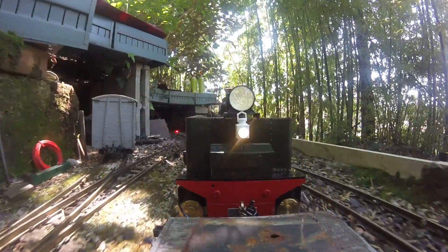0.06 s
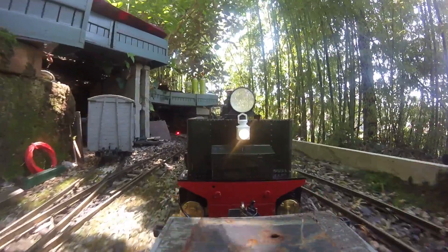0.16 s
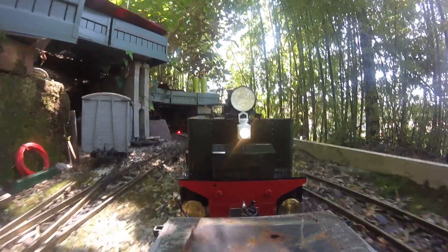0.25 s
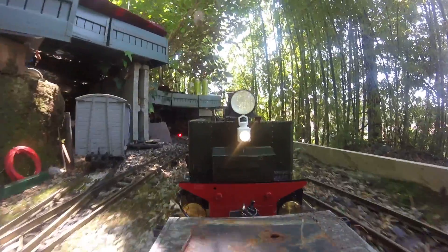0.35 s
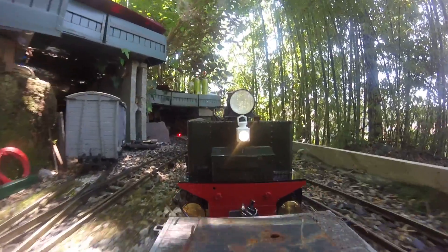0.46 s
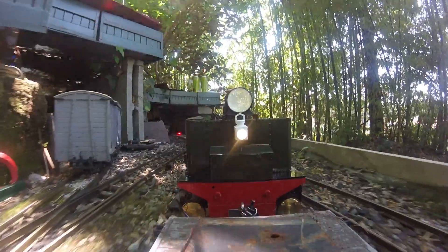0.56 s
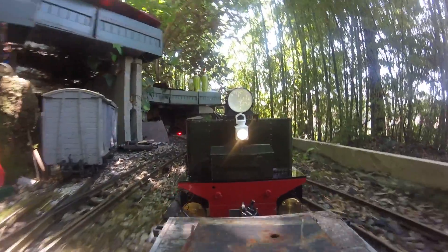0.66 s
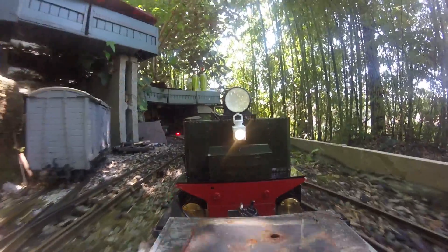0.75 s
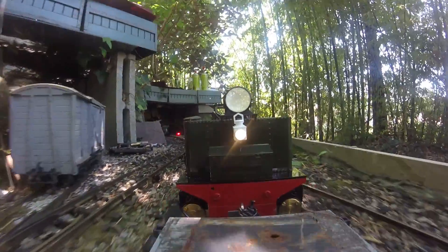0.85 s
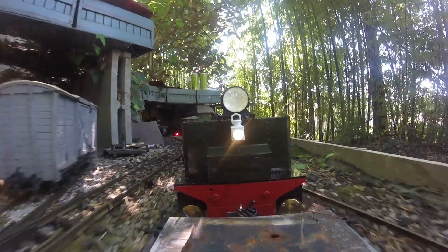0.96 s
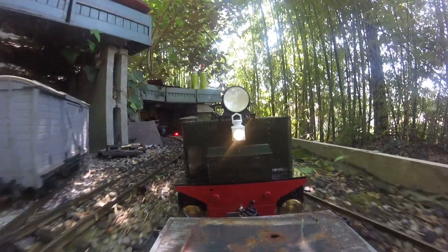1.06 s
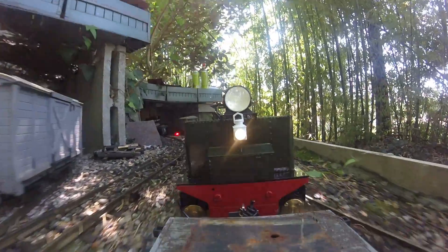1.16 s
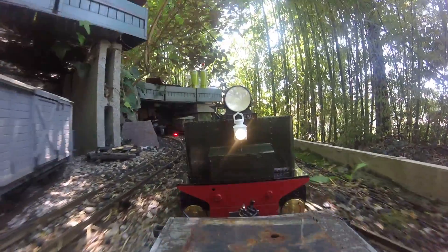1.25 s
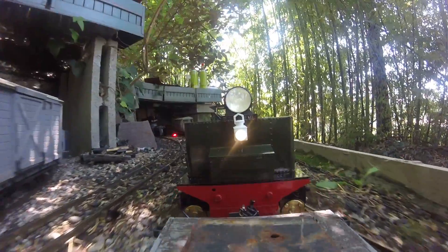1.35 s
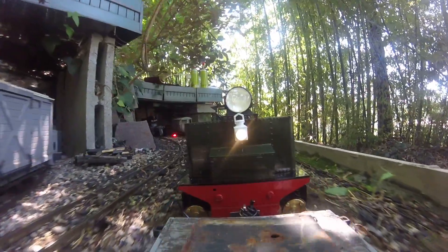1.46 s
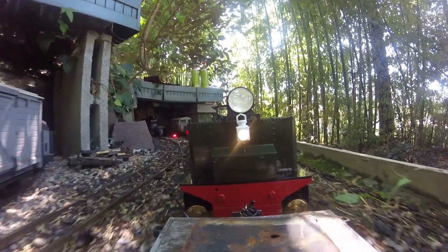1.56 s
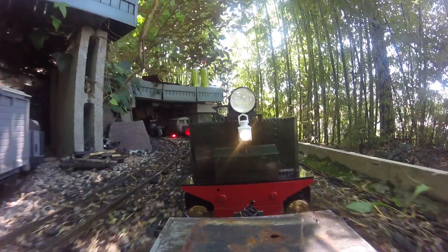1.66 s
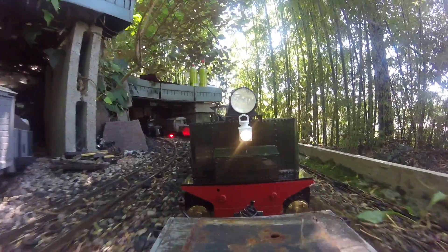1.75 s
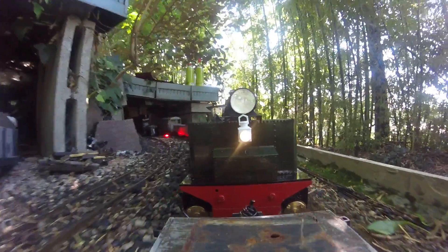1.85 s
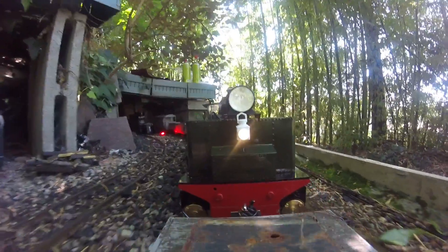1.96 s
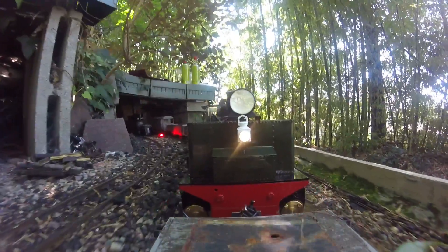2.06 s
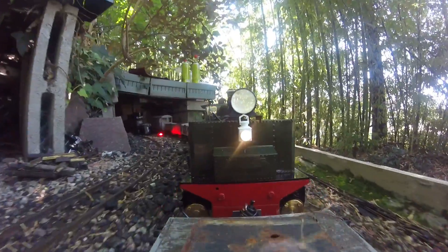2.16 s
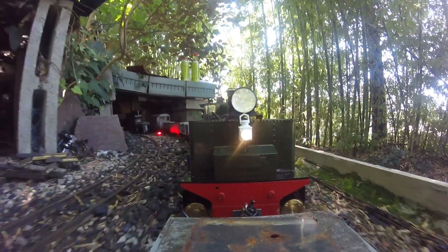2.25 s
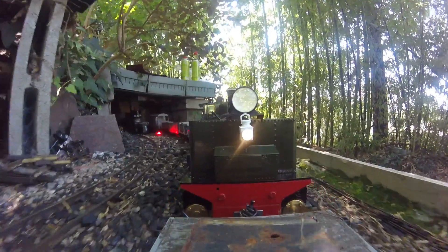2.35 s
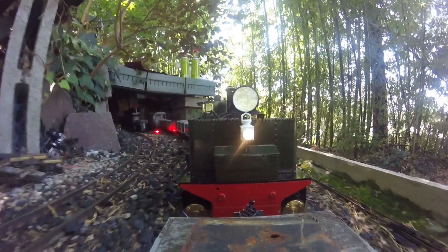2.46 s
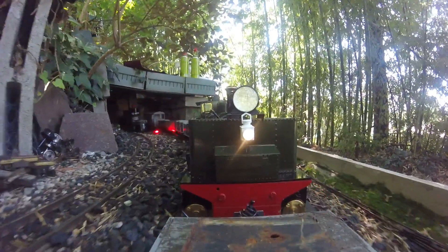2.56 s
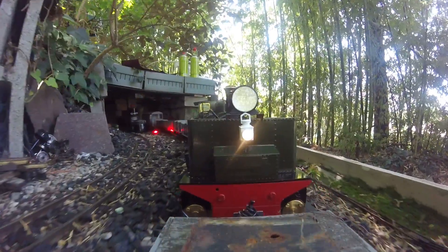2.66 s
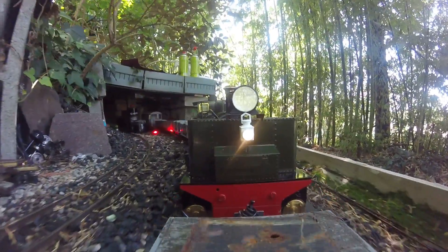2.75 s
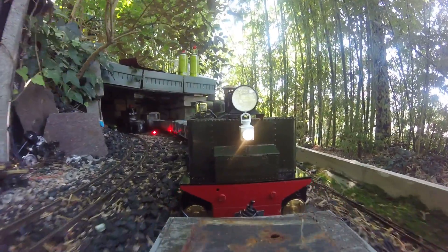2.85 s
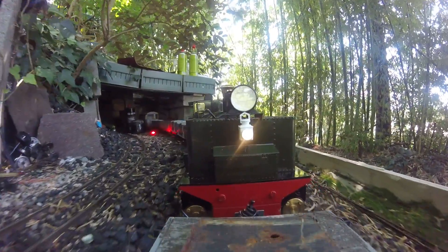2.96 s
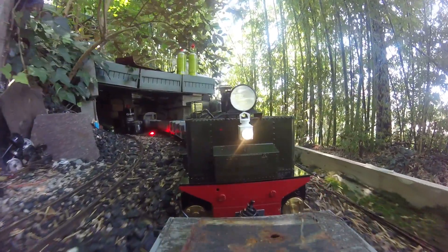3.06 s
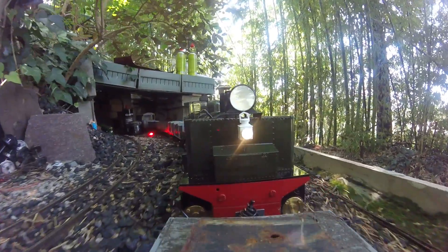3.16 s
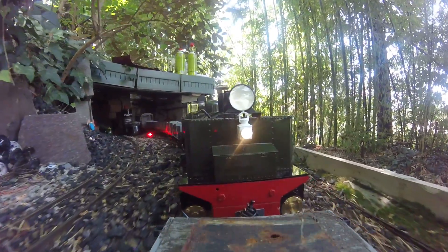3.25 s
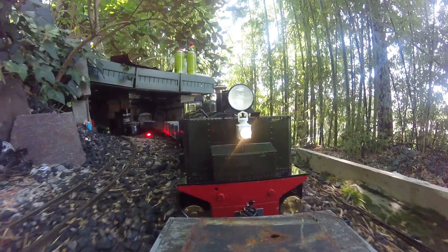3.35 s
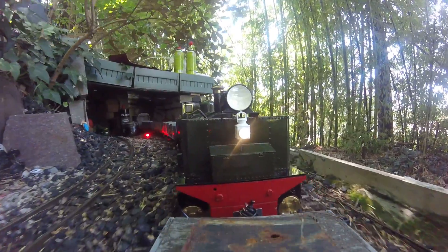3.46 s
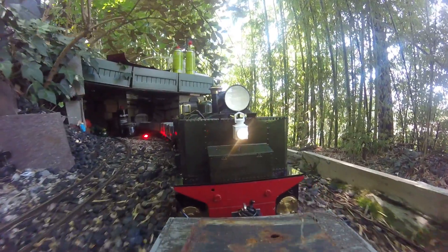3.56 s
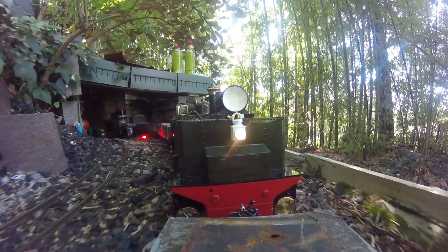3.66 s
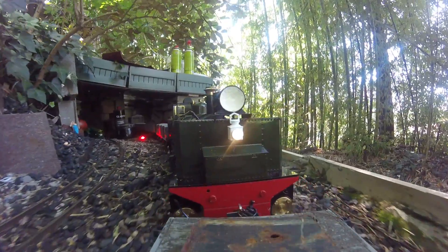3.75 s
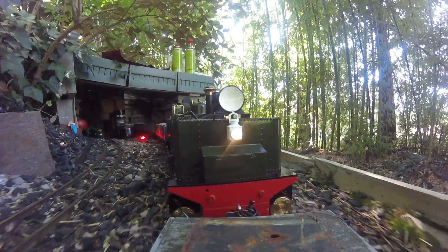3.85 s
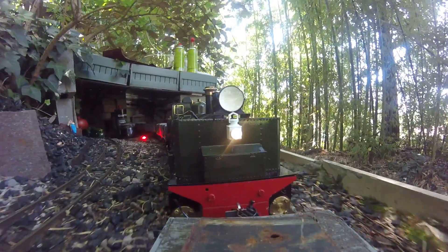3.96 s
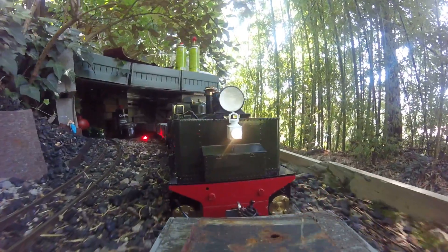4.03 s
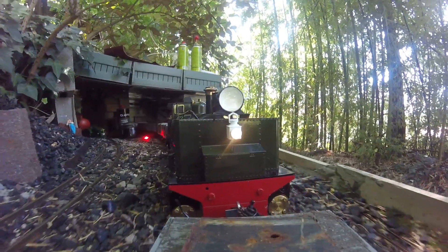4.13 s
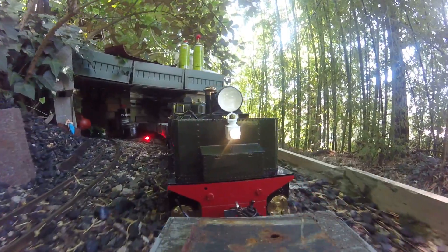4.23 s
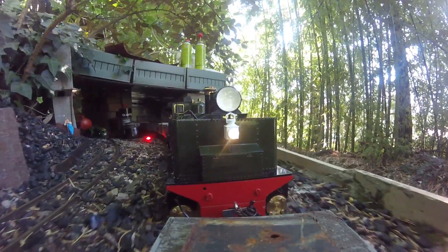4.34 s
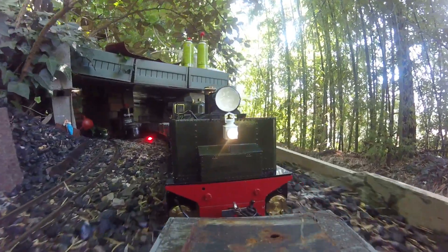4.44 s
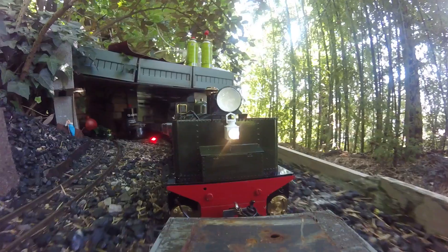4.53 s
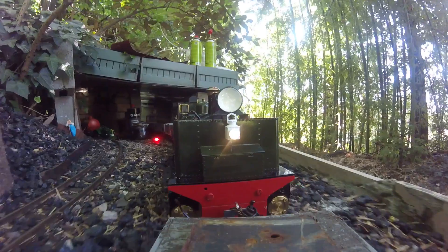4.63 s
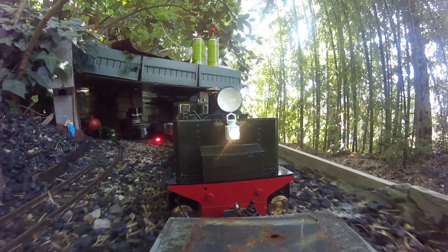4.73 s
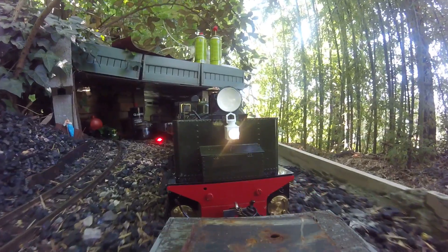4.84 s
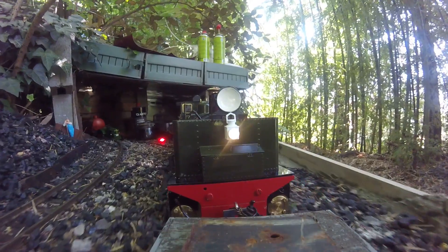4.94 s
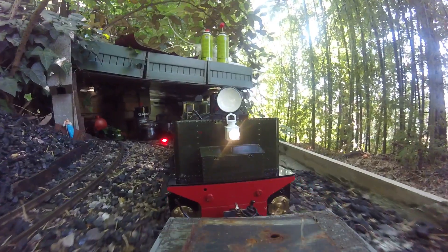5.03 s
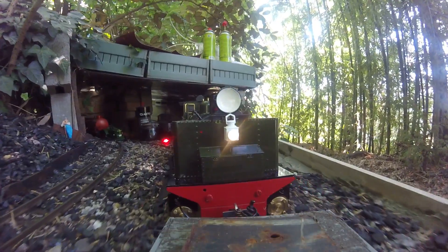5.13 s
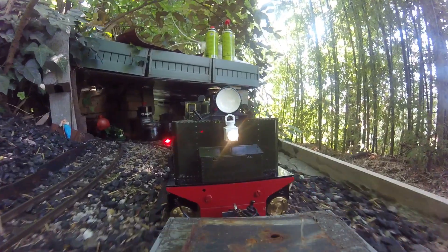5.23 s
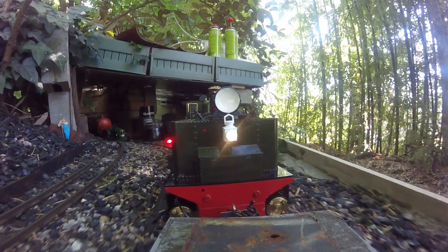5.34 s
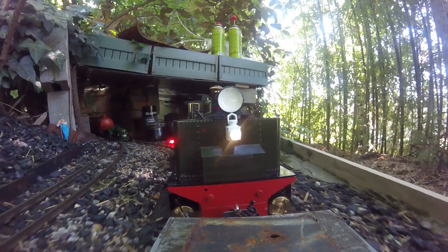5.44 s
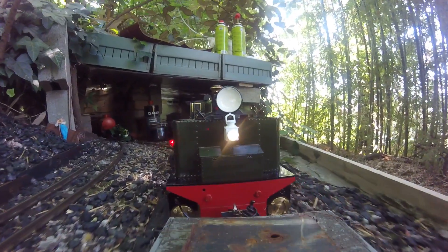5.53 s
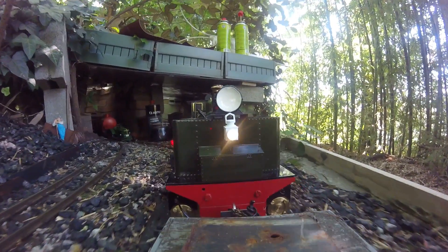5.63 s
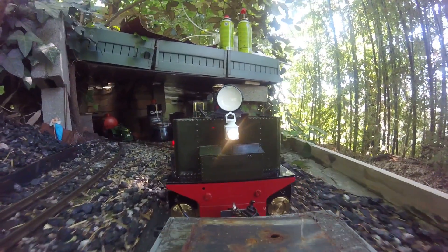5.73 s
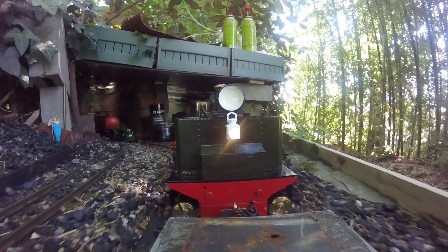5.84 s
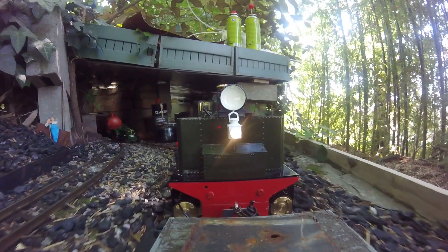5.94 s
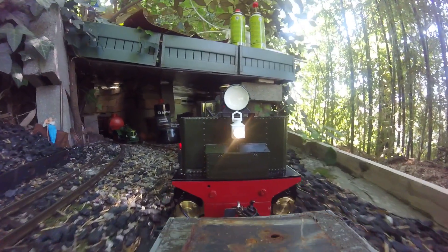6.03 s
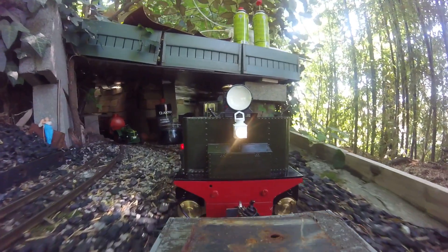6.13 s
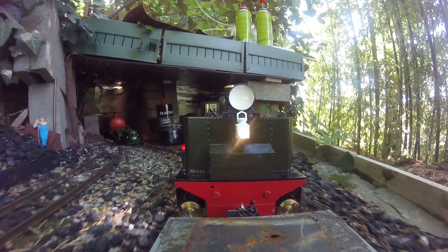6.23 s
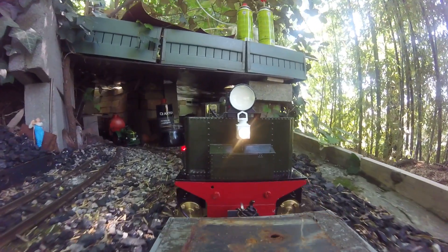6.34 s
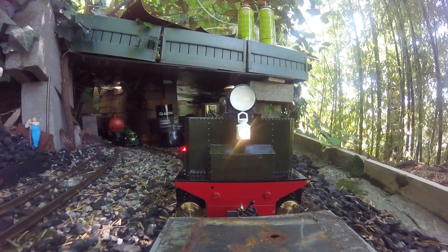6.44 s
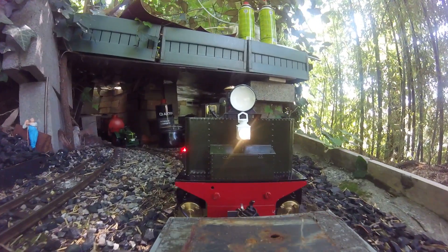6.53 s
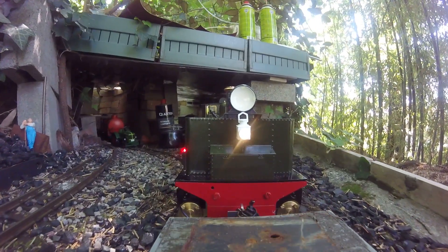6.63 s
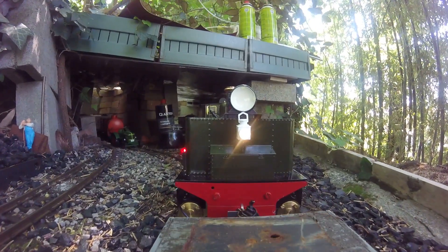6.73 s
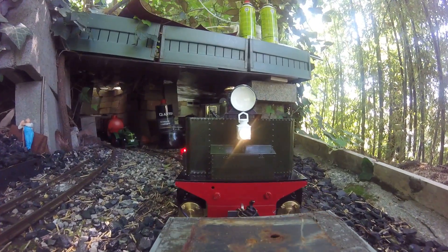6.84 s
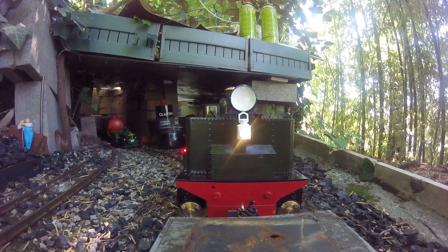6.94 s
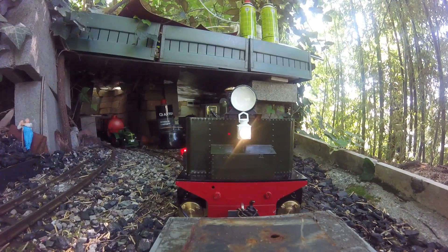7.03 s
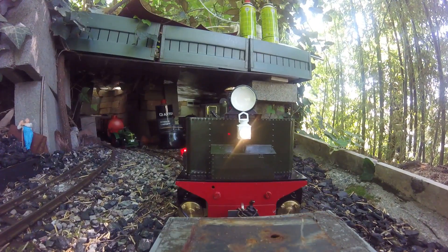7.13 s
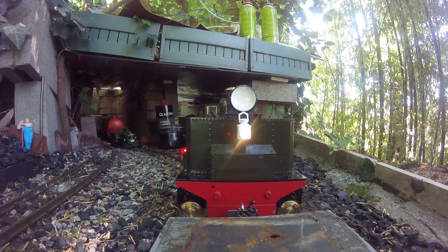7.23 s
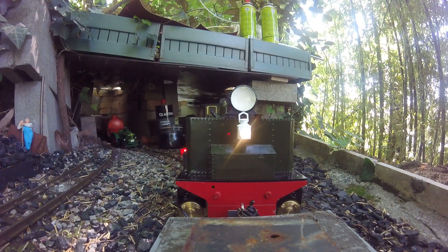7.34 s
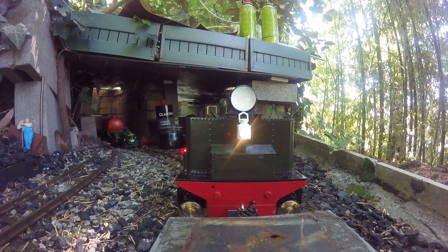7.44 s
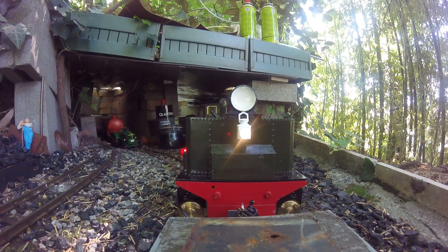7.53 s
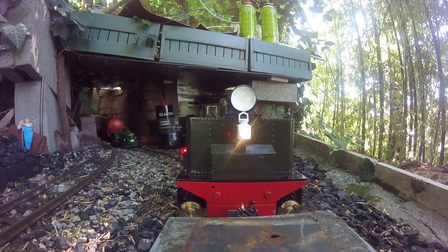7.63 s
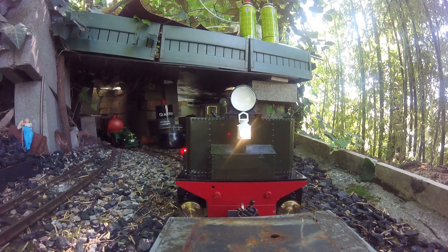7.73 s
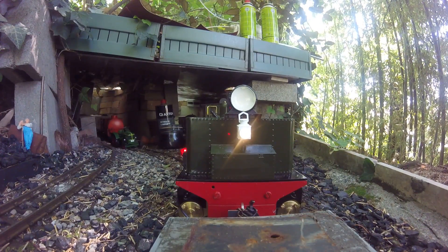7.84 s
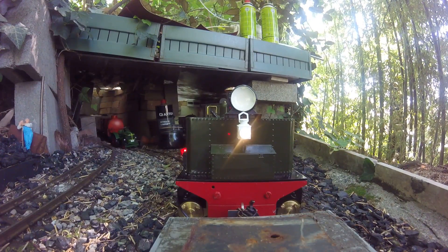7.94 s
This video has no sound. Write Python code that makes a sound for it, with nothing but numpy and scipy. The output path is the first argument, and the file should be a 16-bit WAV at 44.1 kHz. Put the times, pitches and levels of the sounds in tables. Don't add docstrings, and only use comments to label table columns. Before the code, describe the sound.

A small garden train rumbles and clatters over points and rail joints, heard through a camera case on the wagon, then brakes to a halt.

```python
import sys
import numpy as np
from scipy import signal
from scipy.fft import rfft, irfft, next_fast_len
from scipy.io import wavfile
from scipy.ndimage import uniform_filter1d, map_coordinates

SR = 44100
rng = np.random.default_rng(int(sys.argv[2]) if len(sys.argv) > 2 else 0)


def invert_db(level):
    return 10 ** (np.asarray(level, dtype=float) / 20)


def int16_out(signal):
    q = np.round(np.clip(np.atleast_2d(signal).T, -1, 1) * 32767)
    wavfile.write(sys.argv[1], SR, q.astype(np.int16))


N = 352346

# frequency in Hz, level in dB per Hz.
DECK_BODY = [(53, -17), (90, -1.5), (119, -3), (157, -1), (204, -3), (248, -6.5), (296, -21), (340, -21),
             (440, -50), (750, -120)]
# frequency in Hz, level in dB per Hz.
WHEEL_BODY = [(710, -20.5), (1200, -6), (1460, -9), (1580, -5.5), (1730, -0.5), (2090, -0.5), (2310, -8.5),
              (2570, 0), (2800, -6.5), (3010, -3.5), (3200, -7), (3500, -22.5), (4100, -26.5), (5300, -44),
              (9000, -61.5)]
# frequency in Hz, level in dB per Hz.
EDGE_BODY = [(3000, -41.5), (3600, 1.5), (4100, 4), (4600, 0), (5300, -6.5), (5900, -27.5), (9000, -56.5)]


def rolling():
    # time in s, rail roughness in dB, track unevenness in dB,
    # contact brightness in dB.
    roll = [(0.0, -44.5, -18.5, -20.5), (0.24, -43, -22, -13.5), (0.47, -47.5, -29, -15),
            (0.81, -42, -25.5, -12.5), (1.1, -37.5, -24.5, -16.5), (1.56, -45.5, -26.5, -11.5),
            (1.66, -39.5, -29, -12.5), (1.87, -39, -28.5, -9.5), (2.0, -49, -27.5, -15),
            (2.52, -46, -27, -11), (3.09, -37, -26.5, -15), (3.71, -42.5, -35, -13.5),
            (3.79, -37.5, -29.5, -12), (4.8, -33.5, -30.5, -16), (5.59, -34, -25, -15),
            (6.32, -35.5, -22, -12), (6.42, -43.5, -23.5, -13.5), (7.05, -61.5, -42.5, -18)]
    # frequency in Hz, level in dB per Hz.
    sway_body = [(11, -35.5), (18, -0.5), (49, 3), (63, 4), (97, -12.5), (130, -16.5), (170, -34),
                 (290, -120)]
    # frequency in Hz, level in dB per Hz.
    case_body = [(160, -19), (270, 1), (298, -6.5), (398, -5), (471, -6), (553, -9.5), (615, -8),
                 (693, -17), (765, -6), (899, -6.5), (1070, -10.5), (1220, -27.5), (1450, -26),
                 (1880, -58.5), (3190, -120)]
    brake_s, brake_ramp_s, brake_boom_db, brake_deck_db = 6.36, 0.038, -3, -6.5

    case_db, sway_db, bright_db = until_stop(roll)
    flutter = 0.52 * wobble(9.2) + 1.01 * wobble(50)
    braked = np.clip((np.arange(N) / SR - brake_s) / brake_ramp_s, 0, 1)
    grit = chatter(per_s=35, size=1.2 * (1 - braked)) * rough(per_s=700, spread_db=3.5, share=0.5)

    sway = unit(coloured(rng.standard_normal(N), sway_body))
    deck_force = coloured(rough(per_s=250, spread_db=6.5, share=0.31), DECK_BODY)
    deck = unit(invert_db(1.3 * flutter + 1.8 * wobble(30)) * deck_force)
    case_ring = patchy(coloured(grit, case_body), depth_db=1.74)
    case = unit(invert_db(0.62 * flutter + 0.16 * wobble(25)) * case_ring)
    boom = signal.sosfiltfilt(signal.butter(4, 690, fs=SR, output="sos"), case)
    case = case + (invert_db(brake_boom_db * braked) - 1) * boom
    wheel_ring = patchy(coloured(grit, WHEEL_BODY), depth_db=1.9)
    wheel = unit(invert_db(0.56 * flutter + 0.26 * wobble(25)) * wheel_ring)
    edge = invert_db(-23) * unit(coloured(grit, EDGE_BODY))

    out = invert_db(sway_db - 0.5) * sway
    out += invert_db(brake_deck_db * braked) * drumming(case_db) * deck
    out += invert_db(case_db + 2.5) * case
    return out + invert_db(case_db + bright_db) * (wheel + edge)


def until_stop(rows):
    return curves(rows + [(rows[-1][0] + 0.11, -120, -70, rows[-1][3])])


def drumming(rough_db):
    # time in s, level in dB, dying time in s.
    jolts = [(.02, -18, 0.034), (0.161, -18.5, 0.033), (.23, -21, 0.059), (0.579, -19.5, 0.022),
             (0.749, -16.5, 0.064), (.93, -26.5, 0.077), (1.08, -19, 0.23), (1.43, -20.5, 0.049),
             (1.522, -18.5, 0.011), (1.89, -21.5, 0.025), (2.38, -23, 0.019), (2.5, -19.5, 0.057),
             (2.7, -30.5, 0.48), (4.169, -23.5, 0.13), (4.42, -18.5, 0.063), (4.649, -23, 0.35),
             (5.08, -22, .06), (5.168, -17.5, 0.023), (5.25, -27, 0.16), (5.51, -20.5, 0.19),
             (5.92, -25, 0.023), (6.06, -15.5, 0.021)]
    deck_db, knee_db, fades = -30, -42.5, 1.5
    rise_s, linger_db = 0.032, -3
    t = np.arange(N) / SR
    steady = invert_db(deck_db + fades * np.minimum(rough_db - knee_db, 0))
    swells = np.zeros(N)
    for s, db, fall_s in jolts:
        swells += invert_db(2 * (db + linger_db)) * np.exp(-2 * np.abs(t - s) / np.where(t < s, rise_s, fall_s))
    return np.sqrt(steady ** 2 + swells)


def chatter(per_s, size):
    knocks = (rng.random(N) < per_s / SR) * size * rng.random(N)
    return 1 + signal.lfilter([1], [1, -np.exp(-400 / SR)], knocks)


def rough(per_s, spread_db, share):
    size = invert_db(spread_db * np.minimum(rng.exponential(size=N), 2)) * rng.standard_normal(N)
    grit = (rng.random(N) < per_s / SR) * size
    return np.sqrt(share) * unit(grit) + np.sqrt(1 - share) * rng.standard_normal(N)


def bounces():
    # time in s, peak in dB, frequency in Hz, length in s,
    # direction (hump 1, hollow -1).
    bumps = [(0.1295, -15, 62, 0.021, -1), (0.2082, -8, 61, 0.0076, -1), (0.2437, -7.5, 59, 0.017, 1),
             (0.3454, -5.5, 51.7, 0.019, 1), (0.4088, -8, 49.7, 0.014, 1), (0.7144, -16.5, 61, 0.016, -1),
             (0.7498, -10.5, 72, 0.014, 1), (0.8112, -7.5, 55, 0.015, -1), (0.8574, -15, 53.6, 0.033, 1),
             (0.9724, -14.5, 50, 0.051, 1), (1.099, -8, 46, 0.028, -1), (1.143, -13, 69, 0.011, 1),
             (1.4731, -12, 50.7, 0.029, -1), (1.5262, -10.5, 58, 0.014, -1), (1.8535, -13, 44.8, 0.07, -1),
             (1.9033, -5, 56, 0.017, -1), (1.9759, -15, 55, 0.013, -1), (2.0189, -7.5, 52.3, 0.019, 1),
             (2.1152, -10, 56, 0.017, -1), (2.4973, -11.5, 54, 0.027, 1), (2.5687, -3.5, 62.4, 0.014, -1),
             (3.0189, -12.5, 62, 0.022, -1), (3.7161, -12.5, 58.6, 0.025, 1), (4.2082, -10, 61, 0.041, 1),
             (4.4242, -10.5, 52, 0.053, 1), (4.732, -15, 55.3, 0.045, 1), (5.5357, -10, 52, 0.028, 1),
             (5.7839, -14, 61.4, 0.021, -1), (5.9559, -14.5, 67.4, 0.015, -1), (5.9873, -13, 58, 0.019, -1),
             (6.0603, -6, 54, 0.024, -1), (6.0967, -19, 61, 0.027, 1), (6.2922, -12.5, 52, 0.039, 1),
             (6.3695, -5.5, 49, 0.022, 1), (6.4053, -18, 55, 0.024, 1), (6.7127, -12, 50, 0.027, 1)]
    # time in s, peak in dB, direction (hump 1, hollow -1).
    dips = [(0.0391, -18, -1), (0.167, -19, -1), (0.291, -23, 1), (1.0186, -18, 1), (1.0534, -15, -1),
            (1.708, -18, -1), (2.065, -16, 1), (2.3782, -23, 1), (2.426, -15, -1), (2.528, -16.5, -1),
            (2.6359, -18, -1), (3.082, -16.5, -1), (3.422, -19, -1), (3.571, -16, 1), (3.867, -17, -1),
            (4.1654, -18, -1), (4.4807, -16, 1), (5.1762, -14, 1), (5.3346, -12.5, -1), (5.596, -23, -1),
            (5.6545, -20, -1), (5.9285, -21, 1), (6.026, -16, 1), (6.484, -15.5, -1)]
    # time in s, peak in dB, frequency in Hz, length in s, direction.
    strays = [
        (0.319, -6.5, 50, .013, 1),
        (6.4973, -14.5, 36, .016, 1),
        (6.778, -21, 50, 0.019, 1),
        (6.915, -24.5, 52, 0.036, 1),
    ]
    # time in s, peak in dB, frequency in Hz.
    lifts = [(0.0126, -18, 179), (0.0396, -25, 160), (0.082, -18, 191), (0.1567, -10.5, 148),
             (0.2042, -9.5, 197), (0.2225, -17, 157), (0.3187, -9, 150), (0.3445, -16, 114),
             (0.7079, -17, 184), (0.751, -10, 136), (0.7683, -14, 154), (1.022, -16.5, 150),
             (1.0714, -11.5, 165), (1.1222, -13, 259), (1.154, -10, 156), (1.2939, -15.5, 194),
             (1.4441, -12.5, 152), (1.8947, -10, 151), (2.5645, -15.5, 145), (2.7119, -17.5, 210),
             (2.9533, -14.5, 185), (4.1622, -9.5, 155), (4.1812, -11, 92), (4.1995, -10, 173),
             (4.4293, -7.5, 153), (4.6232, -16, 161), (4.668, -12, 152), (4.701, -13, 160),
             (4.755, -21, 194), (5.032, -18.5, 186), (5.1758, -13.5, 198), (5.3676, -17, 196),
             (5.5517, -15, 156), (5.591, -23.5, 224), (6.0652, -17, 132), (6.244, -16.5, 193),
             (6.2865, -14.5, 204)]
    # time in s, peak in dB, frequency in Hz.
    drops = [(0.2466, -15, 170), (0.277, -17.5, 194), (0.831, -11, 161), (0.9075, -13.5, 143),
             (0.928, -10, 166), (0.9481, -8, 164), (0.9926, -16, 152), (1.2638, -11.5, 167),
             (1.5248, -9, 168), (4.2348, -11, 191), (4.2634, -15.5, 219), (4.602, -15.5, 163),
             (4.795, -17.5, 164), (4.8353, -15, 171), (5.0841, -21, 250), (5.1031, -14, 135),
             (5.1496, -13.5, 152), (5.2291, -15.5, 210), (5.519, -10.5, 179), (5.6426, -10, 174),
             (5.9206, -10, 164), (5.967, -18, 204), (6.0412, -9, 160)]
    wagon_hz, dip_s, thump_s = 52, 0.033, 0.0062

    rows = bumps + [(s, db, wagon_hz, dip_s, way) for s, db, way in dips] + strays
    rows += [(*row, thump_s, 1) for row in lifts] + [(*row, thump_s, -1) for row in drops]
    out, t = np.zeros(N + 2 * SR), np.arange(-SR // 10, SR // 4) / SR
    for s, db, hz, length_s, way in rows:
        shape = np.exp(-(t / (length_s * np.where(t < 0, 0.5, 0.7))) ** 2)
        swing = way * invert_db(db - 0.56) * shape * np.cos(2 * np.pi * hz * t)
        out[SR + round(s * SR) - SR // 10:][:len(t)] += swing
    return out[SR:SR + N]


def joints():
    # time in s, wheel in dB, case over it in dB, edge over it in dB.
    cracks = [(0.2013, -18, 2.5, -21.5), (0.3369, -26, 0, -19), (0.742, -26, -1, -11.5),
              (0.7464, -28.5, -3, -8.5), (0.7657, -30, -5, -36), (0.802, -29, 12.5, -19),
              (0.9433, -28.5, 9.5, -27), (1.1201, -22.5, 7, -16.5), (1.1264, -21, 1.5, -25),
              (1.276, -26, 3, -24), (1.893, -15, 4, -26), (1.9288, -25, -4, -29), (2.0038, -13, -8, -30),
              (2.01, -15.5, 4, -40), (2.0264, -25.5, 4.5, -17), (2.143, -29, 3, -45), (2.3695, -24, 9, -25),
              (2.389, -26, 1, -17.5), (2.495, -26.5, 2, -11), (2.5611, -15.5, -3, -11.5),
              (4.154, -21, -1, -34), (4.17, -24, -13, -15.5), (5.49, -24.5, 6, -19.5),
              (5.5143, -17, -4.5, -23), (5.521, -29.5, 6, -22), (5.5435, -30.5, 8, -19),
              (6.0286, -30.5, 8, -24), (6.037, -15.5, -2, -33), (6.3428, -24.5, 5.5, -21.5),
              (6.349, -23.5, 8, -35), (6.356, -29, 5, -36), (6.4796, -18.5, 7, -47)]
    # time in s, wheel level in dB.
    mount_knocks = [(0.0767, -41), (0.162, -34), (0.22, -37.5), (.427, -41), (0.7054, -41), (0.924, -36),
                    (1.0625, -32.5), (1.1517, -31.5), (1.187, -38.5), (1.521, -35.5), (1.887, -31.5),
                    (1.968, -41), (1.9897, -34.5), (2.089, -39.5), (2.3604, -38), (2.6607, -37),
                    (3.157, -39.5), (3.705, -36), (3.9483, -34), (4.162, -24.5), (4.177, -33),
                    (4.2213, -31.5), (4.4212, -29.5), (4.599, -37), (5.1727, -34.5), (5.37, -31),
                    (5.9634, -31), (6.0566, -37), (6.35, -36), (6.4974, -32)]
    # time in s, wheel level in dB, edge over it in dB.
    rattles = [(.2057, -34.5, -13.5), (0.2312, -32, -12.5), (0.347, -46.5, -6), (0.3651, -37, -13),
               (0.404, -39, -15), (0.575, -34.5, -12.5), (0.678, -41.5, -19), (0.7248, -39.5, -17),
               (0.7867, -34, -11.5), (0.849, -40, -24), (1.9429, -38, -16), (1.9827, -36, -9.5),
               (2.002, -25, -18), (2.074, -38, -30), (2.254, -45, -24), (2.352, -45.5, -19),
               (2.385, -35, -17), (2.475, -37, -19), (2.9957, -34.5, -22), (3.163, -35, -34),
               (3.37, -38, -24), (3.5664, -33.5, -39), (3.772, -33.5, -43), (3.8505, -32.5, -21),
               (5.389, -30.5, -28), (6.0637, -29.5, -15), (6.2532, -35, -22)]
    # frequency in Hz, level in dB per Hz.
    knock_body = [(200, -22), (350, -5.5), (600, -2.5), (700, -8.5), (800, -3), (1000, -2.5), (1200, -11),
                  (1500, -18.5), (2500, -76.5)]
    # frequency in Hz, level in dB per Hz.
    snap_body = [(4500, -26), (5800, 0), (6600, 0), (7300, -2), (8000, -19), (12000, -29), (15000, -50)]
    knock_case_db, knock_edge_db, rattle_case_db = 11.5, -21, 6.5

    force, t = np.zeros((5, N + SR)), np.arange(SR // 20) / SR
    t60_s = np.array([[0.01], [0.015], [0.009], [0.007], [0.012]])
    tail_db = np.array([[-29], [-29], [-36], [-50], [-29]])
    fade = invert_db(-60 * t / t60_s) * (1 - np.exp(-t / 0.0005)) + invert_db(tail_db - 60 * t / 0.08)
    small = [(s, db, knock_case_db, knock_edge_db) for s, db in mount_knocks]
    small += [(s, db, rattle_case_db, edge_db) for s, db, edge_db in rattles]
    for s, db, case_db, edge_db in cracks + small:
        ragged = rng.standard_normal((5, len(t))) * fade
        ragged /= np.sqrt(np.mean(ragged[:, :SR // 500] ** 2, axis=1, keepdims=True))
        over_db = [-5.5, case_db - 6.0, edge_db - 3.5, 1.9 * edge_db - 0.1, 0.5 * case_db - 4.5]
        start = round(s * SR)
        force[:, start:start + len(t)] += invert_db(db + np.array(over_db)[:, None]) * ragged
    force[2:4, :N] += invert_db([[0.1], [-12]]) * scrapes()
    bodies = (WHEEL_BODY, knock_body, EDGE_BODY, snap_body, DECK_BODY)
    return singing_disc() + sum(coloured(f, body) for f, body in zip(force, bodies))


def scrapes():
    # time in s, level in dB, half length in s.
    rubs = [
        (1.033, -73.5, 0.29),
        (3.2, -73, .5),
        (4.28, -61, 0.016),
        (5.164, -60.5, 0.082),
        (5.523, -56, 0.013),
        (5.775, -63, 0.033),
        (6.063, -62.5, 0.019),
    ]
    t = np.arange(N) / SR
    pressure = sum(invert_db(db) * np.exp(-((t - s) / half_s) ** 2) for s, db, half_s in rubs)
    return pressure * rough(per_s=900, spread_db=3, share=0.5)


def singing_disc():
    # time in s, frequency in Hz, level in dB, T60 in s.
    ring = (2.012, 1938, -47, .7)
    s, hz, db, t60_s = ring
    since = np.maximum(np.arange(N) / SR - s, 0)
    return invert_db(db - 60 * since / t60_s + 4 * wobble(60)) * np.sin(2 * np.pi * hz * since)


def struck_modes():
    # time in s, peak in dB, frequency in Hz.
    tocks = [(0.077, -29, 860), (0.163, -21.5, 840), (0.201, -19.5, 890), (0.219, -25, 855),
             (0.336, -21.5, 860), (0.741, -23, 956), (0.766, -22.5, 921), (0.802, -20, 867),
             (0.943, -22, 910), (1.063, -22.5, 730), (1.12, -19, 760), (1.153, -31, 807), (1.277, -25, 935),
             (1.52, -20.5, 910), (1.666, -24, 880), (1.694, -21, 880), (1.736, -21.5, 874),
             (1.893, -19, 967), (1.929, -24, 880), (1.968, -26, 770), (1.99, -17.5, 830),
             (2.004, -12.5, 750), (2.009, -10, 855), (2.144, -24.5, 990), (2.371, -14, 867),
             (2.562, -31, 891), (2.657, -23, 880), (3.144, -24, 900), (3.606, -22, 790), (4.153, -28, 855),
             (4.497, -19.5, 865), (4.578, -21.5, 934), (4.7, -21.5, 877), (4.81, -19.5, 907),
             (4.897, -21, 760), (5.064, -19, 880), (5.175, -27, 990), (5.391, -18, 820),
             (5.479, -18.5, 921), (5.515, -11.5, 806), (5.544, -17, 946), (5.751, -20, 797),
             (6.037, -21, 820), (6.259, -18, 977), (6.343, -15, 840), (6.479, -13, 1005),
             (6.4975, -28, 900)]
    # time in s, peak in dB, frequency in Hz.
    bonks = [
        (0.007, -25, 352),
        (0.077, -19, 340),
        (0.164, -14.5, 326),
        (0.2, -15, 360),
    ]
    # time in s, peak in dB, frequency in Hz.
    clinks = [(0.1635, -29, 1900), (0.2019, -18, 1710), (0.3162, -29, 1720), (0.7257, -27.5, 1620),
              (0.7472, -11.5, 1820), (0.7657, -30, 1890), (0.8016, -32, 1780), (0.9248, -34, 1980),
              (0.9434, -29, 1810), (1.064, -26, 1450), (1.1202, -21, 1720), (1.1872, -31, 1700),
              (1.8931, -28, 2150), (1.929, -17, 2050), (1.9679, -24, 1460), (1.9825, -23, 2160),
              (2.0053, -16, 1930), (2.143, -22.5, 1830), (2.3617, -24, 1780), (2.561, -10.5, 1740),
              (2.9953, -29, 1810), (3.5673, -29.5, 1890), (3.706, -28, 2170), (3.7698, -28, 1960),
              (3.8492, -30, 1410), (4.161, -21, 1680), (4.1702, -11, 1760), (4.2233, -23, 1800),
              (5.1716, -32, 1810), (5.4904, -26, 1730), (5.5139, -24.5, 1650), (5.5438, -26, 1700),
              (5.9628, -28, 2040), (6.0282, -31, 1450), (6.0377, -23, 2070), (6.0641, -26, 1700),
              (6.2547, -28, 1670), (6.3428, -14.5, 1570)]
    # time in s, peak in dB, frequency in Hz.
    pings = [
        (0.2009, -24, 2440),
        (1.1209, -26, 2510),
        (1.8931, -14, 2510),
        (2.0048, -18, 2940),
        (2.3705, -24, 3010),
        (2.4952, -22, 2800),
        (2.5611, -24, 2340),
        (5.5139, -21, 2540),
        (6.0382, -19, 2600),
        (6.4797, -12.5, 2580),
    ]
    out = struck(tocks + bonks, t60_s=0.028, gain_db=0)
    out += struck(clinks, t60_s=0.014, gain_db=-3)
    return out + struck(pings, t60_s=0.011, gain_db=0)


def struck(rows, t60_s, gain_db):
    out, t = np.zeros(N + SR), np.arange(SR // 10) / SR
    fade = invert_db(-60 * t / t60_s) * (1 - np.exp(-t / 0.00062))
    for s, db, hz in rows:
        out[round(s * SR):][:len(t)] += invert_db(db) * fade * np.sin(2 * np.pi * hz * t)
    return invert_db(gain_db) * invert_db(1.2 * wobble(300)) * out[:N]


def spikes():
    # time in s, peak in dB.
    ticks = [
        (.2126, -42.5),
        (.2261, -45.5),
        (0.3198, -47.5),
        (0.3224, -44),
        (1.1058, -48),
        (2.015, -39.5),
        (6.0493, -50.5),
        (6.0548, -42.5),
    ]
    # frequency in Hz, level in dB per Hz.
    capsule = [(1200, -26), (4000, -1.5), (14000, -28)]
    kinks = np.zeros(N)
    for s, db in ticks:
        kinks[round(s * SR)] = invert_db(db + 11.5)
    return coloured(kinks, capsule)


def background():
    # frequency in Hz, level in dB per Hz.
    quiet = [(11, -28.5), (20, -14), (40, -14.5), (70, -20), (156, -27), (300, -32.5), (500, -41),
             (2000, -51), (4100, -56), (7200, -61), (9000, -66), (12000, -73), (14000, -74.5),
             (16000, -84.5)]
    # frequency in Hz, level in dB rms.
    whine_tones = [(9598, -92), (9650, -99), (12500, -107)]
    # frequency in Hz, level in dB rms.
    hum_tones = [(24, -39)]
    t = np.arange(N) / SR
    out = invert_db(-46.5 + 0.7 * wobble(6)) * unit(coloured(rng.standard_normal(N), quiet))
    for hz, db in whine_tones:
        out += invert_db(db + 7.5 + 1.5 * wobble(8.8)) * np.sin(2 * np.pi * hz * t + 0.6 * wobble(9))
    for hz, db in hum_tones:
        out += invert_db(db + 1.2 * wobble(6.2)) * np.sin(2 * np.pi * hz * t + 0.4 * wobble(0.96))
    return gain_control() * out


def gain_control():
    # time of the low point in s, depth in dB.
    ducks = [
        (0.499, 10),
        (2.02, 6.5),
    ]
    fall_db_per_s, rise_db_per_s = 29.5, 6
    t = np.arange(N) / SR
    cuts = [db - np.abs(t - s) * np.where(t < s, fall_db_per_s, rise_db_per_s) for s, db in ducks]
    return invert_db(-np.maximum(np.max(cuts, axis=0), 0))


def unit(x):
    return x / np.sqrt(np.mean(x ** 2) + 1e-20)


def curves(rows):
    s, *cols = np.transpose(rows)
    return [np.interp(np.arange(N) / SR, s, c) for c in cols]


def wobble(rate):
    knots = rng.standard_normal(int(N * rate / SR) + 4)
    return map_coordinates(knots, [np.arange(N) * rate / SR])


def coloured(x, points):
    m = 2 * next_fast_len(N // 2 + SR // 4)
    hz, db = np.transpose(points)
    log_hz = np.log(np.fft.rfftfreq(m, 1 / SR) + 1)
    gain = invert_db(np.interp(log_hz, np.log(hz + 1), np.maximum(db, -90)))
    cepstrum = irfft(np.log(unit(gain)), m)
    cepstrum[1:m // 2] *= 2
    cepstrum[m // 2 + 1:] = 0
    return irfft(rfft(x, m) * np.exp(rfft(cepstrum)), m)[:N]


def patchy(x, depth_db):
    z = signal.stft(x, nperseg=512)[2]
    field = uniform_filter1d(rng.standard_normal(z.shape), size=3, axis=0)
    field = uniform_filter1d(field, size=7, axis=1)
    return signal.istft(z * invert_db(depth_db * unit(field)), nperseg=512)[1][:N]


def scene():
    train = rolling() + bounces() + joints() + struck_modes() + spikes()
    return (train + background())[None]


def band_limit(x):
    return signal.sosfilt(signal.butter(12, 15700, fs=SR, output="sos"), x)


def record(dry):
    squeezed = dry / (1 + np.abs(dry / 0.74) ** 5) ** (1 / 5)
    return band_limit(squeezed)


dry = scene()
out = record(dry)
int16_out(out)
```